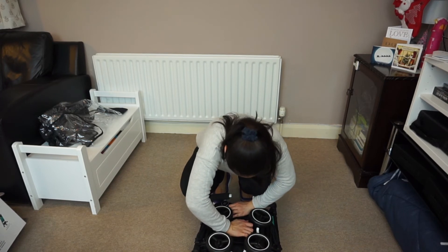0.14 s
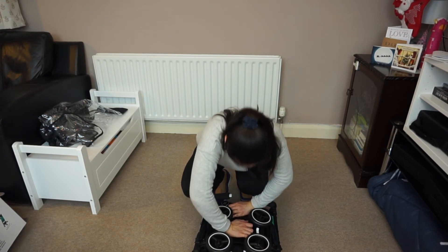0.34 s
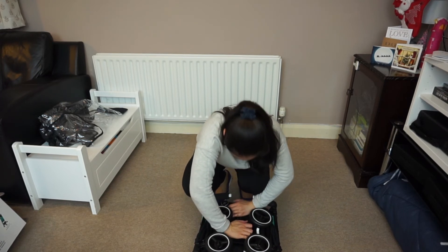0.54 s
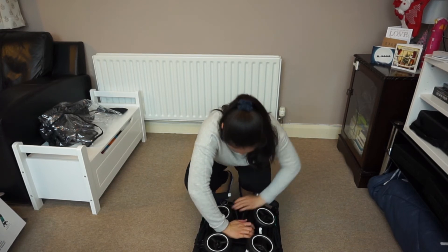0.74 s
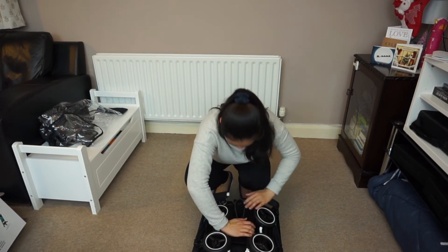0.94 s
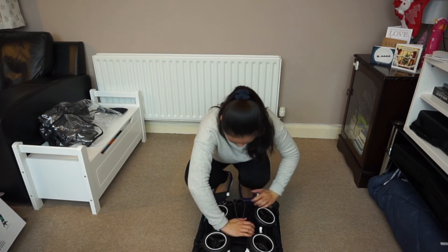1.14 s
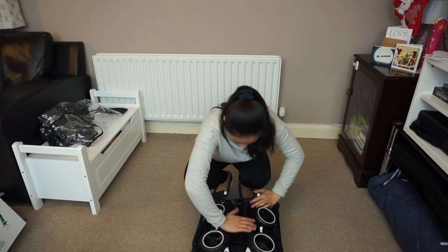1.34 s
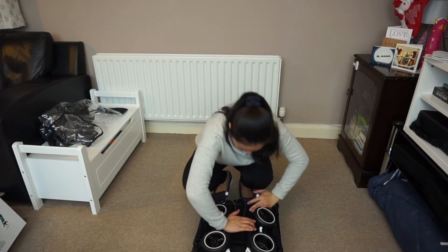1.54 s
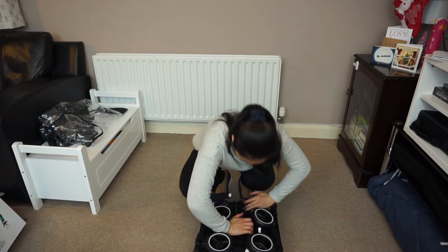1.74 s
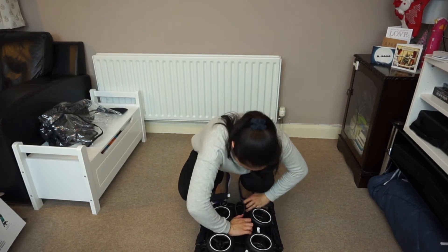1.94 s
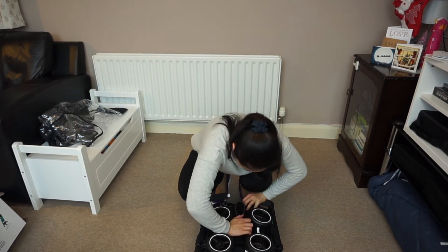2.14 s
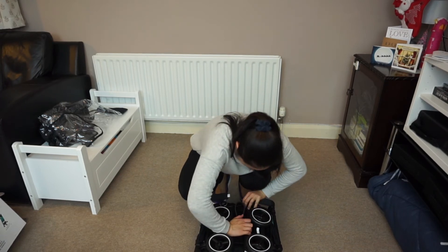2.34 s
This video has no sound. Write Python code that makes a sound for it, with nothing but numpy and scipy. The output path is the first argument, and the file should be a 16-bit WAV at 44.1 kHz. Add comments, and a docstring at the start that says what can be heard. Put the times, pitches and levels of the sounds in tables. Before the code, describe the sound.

A stroller latch snaps shut, then the frame's tubes and wheels knock and settle.

```python
"""A stroller's latch snaps shut as the folded frame is pressed flat by hand on a living-room carpet.
Tubes and wheels knock and settle, plastic ticks, and each of these contacts rings the frame.
The frame bumps softly on the floor, and the fabric rustles and slides under the hands.
Heard from nearby on a stereo pair of microphones: the room answers every blow,
and a faint hum and hiss lie underneath."""
import sys
import numpy as np
from scipy import signal
from scipy.fft import rfft, irfft, next_fast_len
from scipy.io import wavfile
from scipy.ndimage import map_coordinates

SR = 44100
rng = np.random.default_rng(int(sys.argv[2]) if len(sys.argv) > 2 else 0)


def transcribe(signal):
    """Save signal, clipped to [-1, 1], as a 16-bit WAV file at the path in sys.argv[1]."""
    frames = np.atleast_2d(signal).T
    limited = np.clip(frames, -1, 1)
    pcm = np.round(limited * 32767).astype(np.int16)
    wavfile.write(sys.argv[1], SR, pcm)


N = 105840  # 2.4 s


def amp(db):
    """Decibels to gain."""
    return 10 ** (np.asarray(db) / 20)


def unit_rms(x):
    """Scale to rms 1."""
    return x / np.sqrt(np.mean(x ** 2) + 1e-20)


def unit_energy(x):
    """Scale to a mean energy of 1 per channel."""
    return unit_rms(x) / np.sqrt(x.shape[-1])


def along(points, hz):
    """Read a curve of (frequency [Hz], value) on a log axis."""
    freqs, values = np.transpose(points)
    return np.interp(np.log(hz + 1), np.log(freqs + 1), values)


def filtered(x, response):
    """Pass x through a frequency response."""
    n = x.shape[-1]
    padded = next_fast_len(n + SR // 4)
    return irfft(rfft(x, padded) * response(np.fft.rfftfreq(padded, 1 / SR)), padded)[..., :n]


def causal_pulse(gain_db, size=4096):
    """The shortest causal pulse whose spectrum has the shape gain_db(hz)."""
    cepstrum = irfft(np.log(amp(gain_db(np.fft.rfftfreq(size, 1 / SR)))))
    cepstrum[1:size // 2] *= 2
    cepstrum[size // 2 + 1:] = 0
    return unit_energy(irfft(np.exp(rfft(cepstrum))))


def excite(response, pulse):
    """One second of a stereo response driven by a pulse, at unit energy."""
    return unit_energy(signal.fftconvolve(response, pulse[None], axes=1)[:, :SR])


def stereo_noise(likeness, size):
    """White noise that is partly alike at the two microphones."""
    def split(hz):
        angle = np.arccos(np.clip(along(likeness, hz), -1, 1)) / 2
        return np.array([np.cos(angle), np.sin(angle)])
    mid, side = filtered(rng.standard_normal((2, size)), split)
    return np.array([mid + side, mid - side])


def add(out, time_s, sound):
    """Mix a sound in at time_s."""
    start = round(time_s * SR)
    part = sound[:, max(-start, 0):N - start]
    out[:, max(start, 0):][:, :part.shape[1]] += part


# Spectrum of the quiet living room (frequency [Hz], level [dB])
HISS_COLOUR = [(15, -84), (25, -95), (92, -18), (128, -24), (192, -9.5), (344, -5.5), (433, -0.5),
               (518, -10), (721, -1), (778, -9), (840, 2.5), (907, -18.5), (1330, 1), (2330, -15),
               (2780, -11.5), (4400, -16), (11000, -21.5), (14300, -60), (22000, -120)]
# Likeness of that hiss at the two microphones (frequency [Hz], correlation [0-1])
HISS_LIKENESS = [(100, 0.53), (1000, 0.23), (3000, 0.18), (10000, 0.41)]
def room_tone():
    """Steady room noise and a faint mains hum."""
    hiss_db, hum_db, hum_hz = -67, -94.5, 97.3
    hiss = filtered(stereo_noise(HISS_LIKENESS, N), lambda hz: amp(along(HISS_COLOUR, hz)))
    hum = np.sqrt(2) * np.sin(2 * np.pi * hum_hz * np.arange(N) / SR)
    return amp(hiss_db) * unit_rms(hiss) + amp(hum_db) * hum


# Reverberation of the living room (frequency [Hz], time to fall 60 dB [s])
ROOM_DECAY = [(150, 0.4), (400, .48), (1000, 0.39), (2700, .43), (5000, .41), (10000, 0.26)]
# Likeness of sounds in the room at the two microphones (frequency [Hz], correlation [0-1])
ROOM_LIKENESS = [(100, 0.68), (600, 0.545), (1500, 0.67), (2700, 0.69), (4500, 0.18), (6200, 0.69),
                 (8500, 0.32), (11000, 1)]
def room_tail(build_s=0.012):
    """One second of the room's answer: it builds up, then each band dies at its own speed."""
    hz, t, bands = signal.stft(stereo_noise(ROOM_LIKENESS, SR), SR, nperseg=256)
    decay = amp(-60 * t / along(ROOM_DECAY, hz)[:, None])
    tail = signal.istft(bands * decay, SR, nperseg=256)[1][:, :SR]
    return unit_energy(tail * (1 - np.exp(-np.arange(SR) / SR / build_s)))


def cloth_friction(levels, colour, catches_per_s=240, grain_db=-1.5):
    """Cloth slips and catches, making a hiss with a fine, uneven grain."""
    t = np.arange(N) / SR
    hiss = filtered(stereo_noise(ROOM_LIKENESS, N), lambda hz: amp(along(colour, hz)))
    catches = map_coordinates(rng.standard_normal(N // 10), [t * catches_per_s])
    envelope = amp(np.interp(t, *np.transpose(levels)))
    return unit_rms(hiss * amp(grain_db * catches)) * envelope


# Hands rubbing the fabric, and one hand sliding over it (time [s], level [dB])
RUB_LEVELS = [(0, -69.5), (.2, -65), (.6, -74.5), (1.12, -74), (1.3, -72.5), (1.44, -76), (1.56, -69.5),
              (1.62, -64.5), (1.72, -61), (1.78, -58), (1.9, -64), (2.0, -66.5), (2.12, -65), (2.25, -71),
              (2.4, -76.5)]
SLIDE_LEVELS = [(1.2, -91.5), (1.25, -66.5), (1.31, -61.5), (1.37, -66), (1.45, -87)]
# Spectra of the rubbing and the slide (frequency [Hz], level [dB])
RUB_SPECTRUM = [(88, -65), (150, -22.5), (337, -8.5), (410, -28), (449, -1), (716, -5), (1060, 2.5),
                (1210, -9.5), (2520, -3.5), (5270, -23.5), (11000, -21), (14300, -69.5), (22000, -120)]
SLIDE_SPECTRUM = [(200, -27), (750, -2.5), (1100, -4.5), (1900, -3.5), (2800, 1.5), (3500, -8),
                  (4400, -18.5), (7000, -20.5), (10500, -17)]
def fabric():
    """The fabric rustles under the hands throughout, with one short slide midway."""
    return cloth_friction(RUB_LEVELS, RUB_SPECTRUM) + cloth_friction(SLIDE_LEVELS, SLIDE_SPECTRUM)


# Soft bumps of the frame down on the floor (time [s], strength [dB], pitch [Hz])
FLOOR_BUMPS = [(2.015, -33.5, 445), (2.023, -31, 418), (2.074, -53, 385), (2.12, -43, 376),
               (2.145, -42.5, 360)]
def carpet_bumps(t60_s=0.029, rise_s=0.0028, room_db=-5.5):
    """The frame settles on the carpet with short, low notes."""
    out, t = np.zeros((2, N)), np.arange(SR) / SR
    envelope = amp(-60 * t / t60_s) * (1 - np.exp(-t / rise_s))
    for time_s, db, hz in FLOOR_BUMPS:
        note = unit_energy(np.sin(2 * np.pi * hz * t) * envelope)
        echo = excite(room_tail(), note)
        add(out, time_s, amp(db) * (note + amp(room_db) * echo))
    return out


# Modes of the stroller frame (frequency [Hz], level [dB], time to fall 60 dB [s])
FRAME_MODES = [(427, -3, .33), (757, -2, .28), (1230, -8, .33), (1351, -6, .35), (1618, -4, .25),
               (1747, -2, .42), (1972, -3, .38), (2047, -4, .32), (2132, -2, .38), (2172, -2, .35),
               (2417, -5, .33), (2597, -4, .33), (2719, -1, .35), (2822, -3, .35), (3939, -7, .35)]
def frame_ring():
    """The struck frame rings on, slightly out of step at the two microphones."""
    t = np.arange(SR) / SR
    phases = rng.normal(0, .35, (len(FRAME_MODES), 2, 1))
    return sum(amp(db - 60 * t / t60) * np.sin(2 * np.pi * hz * t + phase)
               for (hz, db, t60), phase in zip(FRAME_MODES, phases))


def click(colour, tilt_db, part_hz, peak_db=7.5, half_width_octaves=.14, pivot_hz=2000):
    """The pulse of one contact: a tilted spectrum plus the struck part's own short resonance."""
    def gain_db(hz):
        octaves = np.log2(np.clip(hz, 300, 6000) / pivot_hz)
        resonance_db = peak_db / (1 + (np.log2((hz + 1) / part_hz) / half_width_octaves) ** 2)
        return along(colour, hz) + tilt_db * octaves + resonance_db
    return causal_pulse(gain_db)


# Colour of each contact's direct sound: a soft contact with a crack near 3.5 kHz (frequency [Hz], level [dB])
DIRECT_COLOUR = [(60, 2), (200, -5), (500, -5), (1000, -3), (1600, 1.5), (2700, 1), (3500, 3.5), (4100, -0.5),
                 (4800, -8.5), (6000, -5.5), (11000, -2)]
def blows(contacts, colour, chatter_db, chatter_t60_s, ring_db, shared_echo=.25):
    """Surfaces click and briefly scrape as they meet; each contact rings the frame and the room."""
    out, t = np.zeros((2, N)), np.arange(SR) / SR
    ring, common_tail = frame_ring(), room_tail()
    direct_colour = causal_pulse(lambda hz: along(DIRECT_COLOUR, hz))
    for time_s, db, tilt_db, room_db, part_hz in contacts:
        pulse = click(colour, tilt_db, part_hz)
        chatter = stereo_noise(ROOM_LIKENESS, SR) * amp(-60 * t / chatter_t60_s)
        contact = amp(chatter_db) * unit_energy(chatter)
        contact[:, 0] += 1  # the impact itself
        direct = excite(signal.fftconvolve(contact, direct_colour[None], axes=1), pulse)
        echoes = np.sqrt(shared_echo) * common_tail + np.sqrt(1 - shared_echo) * room_tail()
        tail = excite(echoes, pulse) + amp(ring_db) * excite(ring, pulse)
        add(out, time_s, amp(db) * (direct + amp(room_db) * tail))
    return out


# Plastic contacts (time [s], strength [dB], tilt [dB/octave], room and ring [dB], resonance [Hz])
TICK_CONTACTS = [(1.3725, -32.5, 0.5, -4.5, 2310), (1.985, -35, -6, 1.5, 3270)]
# Spectrum of a tick (frequency [Hz], level [dB])
TICK_SPECTRUM = [(200, -37), (800, -4.5), (1600, -14), (2100, 0), (3500, -4), (4100, -28), (11000, -16.5)]
def plastic_ticks():
    """Plastic parts touch lightly, twice."""
    return blows(TICK_CONTACTS, TICK_SPECTRUM, chatter_db=-2, chatter_t60_s=0.027, ring_db=-4.5)


# Tubes and wheels (time [s], strength [dB], tilt [dB/octave], room and ring [dB], resonance [Hz])
KNOCK_CONTACTS = [(-.05, -21.5, -4.5, 5, 1330), (.6665, -32.5, 7, -1.5, 1880), (.6732, -12, 2.5, 2.5, 2700),
                  (.6752, -9, 0.5, 1.5, 1700), (.6825, -14, 2.5, -3, 1880), (.6865, -15.5, 2.5, -10, 1778),
                  (.7055, -20.5, -3.5, 1.5, 2840), (.7182, -14.5, -2, -3, 1680),
                  (.7245, -11.5, -1.5, -1.5, 1480), (.7340, -15, -1, -2, 1300), (.824, -31, 3.5, 0, 3020),
                  (1.18, -40.5, -2, -6, 815), (1.585, -36.5, 13.5, 5, 2010), (1.5985, -21.5, 0, 1, 1360),
                  (1.604, -23, -2, -1, 2020), (1.644, -26, -1, 1, 1150), (1.69, -30.5, -1, 5.5, 1200),
                  (1.751, -23, -.5, 0.5, 2150), (1.762, -27.5, 0.5, 5, 2650), (1.79, -29.5, -5.5, 2.5, 864),
                  (1.825, -30.5, 2.5, 4.5, 1210), (1.88, -33, 0.5, 5, 2710), (2.229, -43, -5, 3, 630),
                  (2.28, -41.5, -16.5, -0.5, 560), (2.361, -41, -4.5, 5, 1220)]
# Spectrum of a knock (frequency [Hz], level [dB])
KNOCK_SPECTRUM = [(24, -76), (40, -64), (93, -31.5), (156, -32), (275, -22), (309, -25.5), (364, -14),
                  (506, -6), (869, -7), (955, -12), (1210, -4), (1420, -2.5), (2440, -8), (3560, -19),
                  (4720, -23), (5190, -30.5), (11000, -35), (14300, -80), (22000, -120)]
def tube_knocks():
    """Tubes and wheels knock together in loose clusters as they settle."""
    return blows(KNOCK_CONTACTS, KNOCK_SPECTRUM, chatter_db=4.5, chatter_t60_s=.028, ring_db=-8.5)


# Latch contacts (time [s], strength [dB], tilt [dB/octave], room and ring [dB], resonance [Hz])
LATCH_CONTACTS = [(.219, -36.5, -11.5, 0, 614), (.2263, -25.5, -9.5, 10.5, 970), (.2325, -29, 6, 12, 800),
                  (.2396, -14.5, -1.5, 1, 2680), (.2413, 2.5, -1, -11, 3600), (.2428, 2.5, 1.5, -1, 2370),
                  (.2466, -1, -1, 3, 788), (.2485, -4.5, 2.5, 2.5, 2600), (.2730, -6.5, -5.5, -2, 2582)]
# Spectrum of the latch (frequency [Hz], level [dB])
LATCH_SPECTRUM = [(40, -65), (112, -48), (288, -22), (420, -14), (560, -12), (740, -8.5), (950, -10),
                  (1400, -6), (1820, -8), (2100, 1), (2420, -8), (2750, -2.5), (3600, -7.5), (4150, -11),
                  (4700, -9.5), (5350, -15), (5850, -25), (11000, -26.5)]
def latch_snap():
    """The latch shuts: nine quick contacts run together into one loud snap."""
    return blows(LATCH_CONTACTS, LATCH_SPECTRUM, chatter_db=1.5, chatter_t60_s=0.024, ring_db=-6.5)


# Balance across the microphone pair (frequency [Hz], left minus right [dB])
PAIR_BALANCE = [(100, 0.5), (600, -0.5), (1100, -0.1), (2000, -1.4), (3500, -3.5), (6200, -1.5),
                (11000, -2.2)]
# Phase across the pair (frequency [Hz], lead of the left [rad])
PAIR_PHASE = [(50, 0.1), (400, 0.304), (1100, 0.97), (3000, 0.77), (4800, .9), (6500, 0.25), (11000, 0.26)]
def microphones(x):
    """The pair hears the stroller a little earlier on the left and a little brighter on the right."""
    half = np.array([[.5], [-.5]])
    def response(hz):
        return amp(half * along(PAIR_BALANCE, hz)) * np.exp(1j * half * along(PAIR_PHASE, hz))
    return filtered(x, response)


def scene():
    """The stroller over the quiet living room, heard from where the microphones stand."""
    stroller = latch_snap() + tube_knocks() + plastic_ticks() + carpet_bumps() + fabric()
    return microphones(stroller + room_tone())


def record(dry):
    """The recorder cuts off steeply above its band limit."""
    limit_hz = 11060
    return filtered(dry, lambda hz: 1 / np.sqrt(1 + (hz / limit_hz) ** 280))


dry = scene()
out = record(dry)
transcribe(out)
```